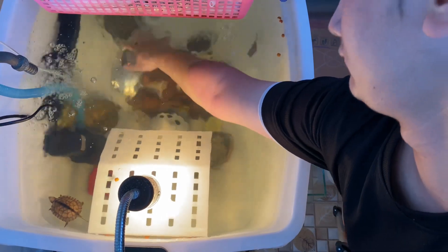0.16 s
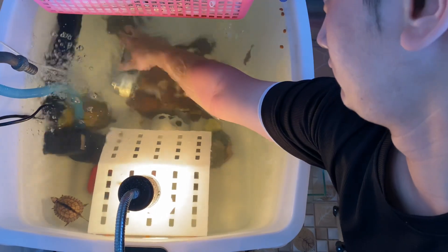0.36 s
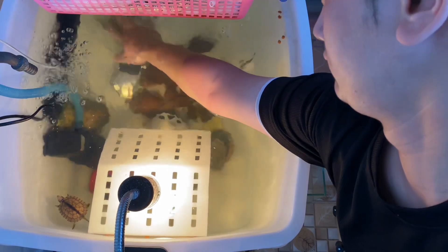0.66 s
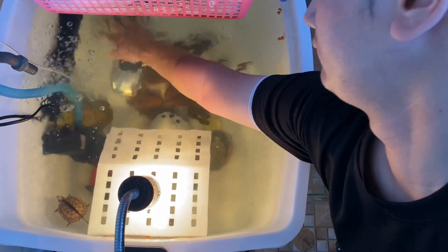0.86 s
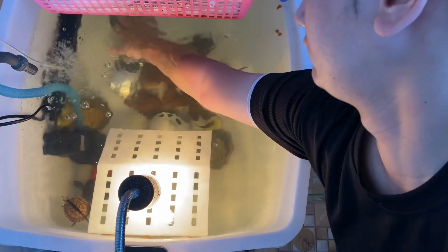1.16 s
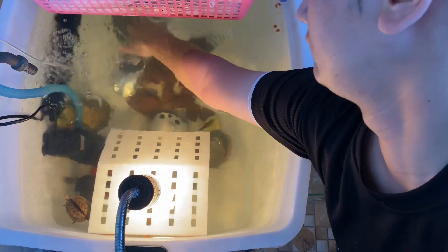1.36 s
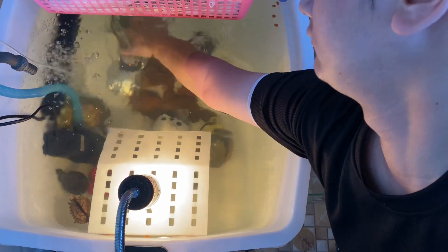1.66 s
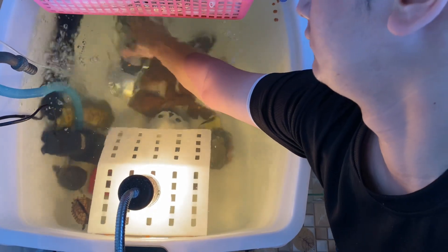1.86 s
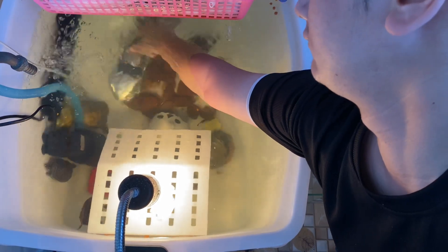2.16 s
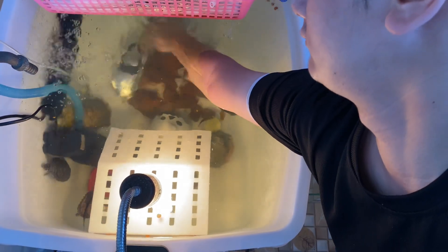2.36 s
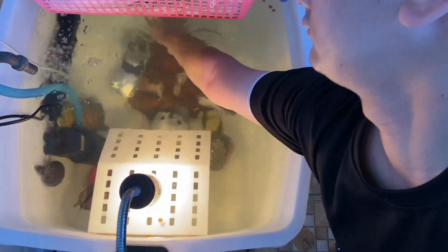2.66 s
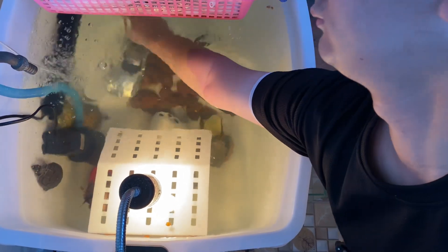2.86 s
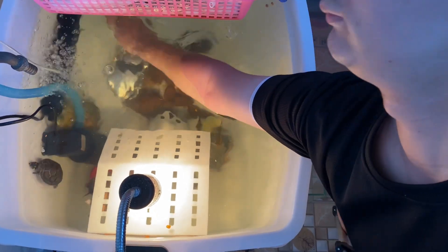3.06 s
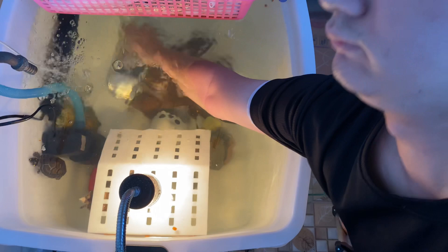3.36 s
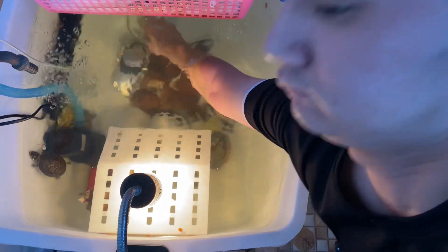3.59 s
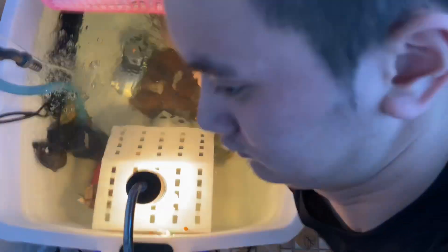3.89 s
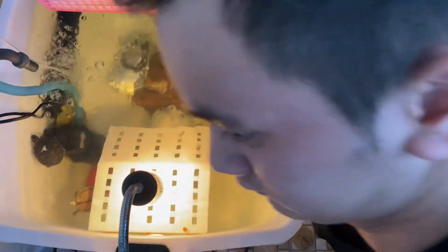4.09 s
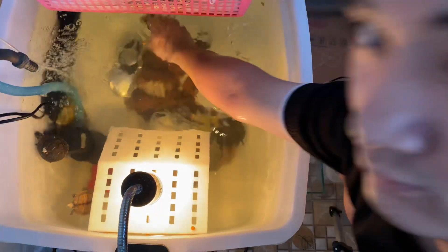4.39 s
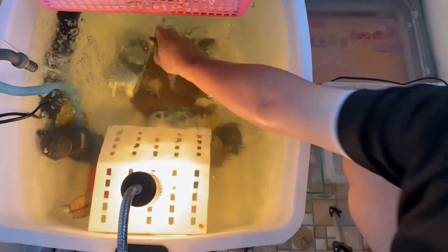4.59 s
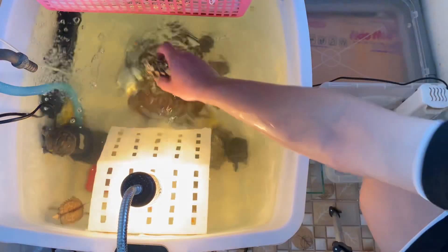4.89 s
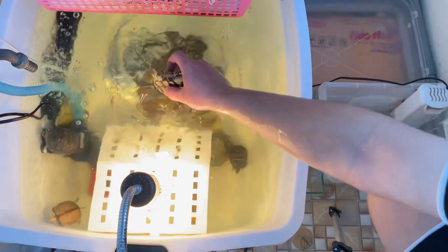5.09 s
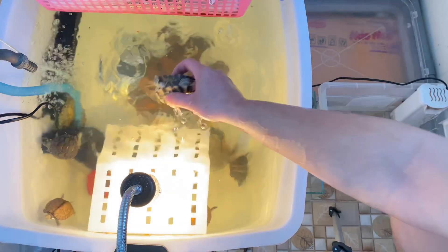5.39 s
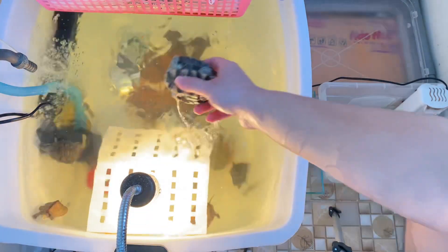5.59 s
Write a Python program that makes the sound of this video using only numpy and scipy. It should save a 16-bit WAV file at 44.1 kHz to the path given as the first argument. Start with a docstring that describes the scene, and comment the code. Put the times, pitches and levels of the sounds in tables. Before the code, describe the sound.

A small submerged pump gives a steady low hum while its outlet pours into a water-filled plastic tub, bubbling and splashing. Bright drips and ticks of spray are scattered throughout as a hand stirs the water. About two thirds through, something knocks hollowly against the tub wall in a quick clatter, ending in a dull bump. The water and hum carry on, heard close from above in a small tiled room.

```python
"""A small submerged pump hums in a plastic turtle tub indoors, its magnet vibrating at twice the shaft speed.
Its outlet pours onto the water: turbulence excites the tub's resonances, trapped air rings as
bubbles, and spray and single bright drips tick on the surface. A hand gropes in the tub, knocks
something hollow against its wall and lifts a dripping turtle out. A close two-port microphone
listens from above in a small tiled room; near the end the low sound briefly swings wide."""
import sys
import numpy as np
from scipy import signal
from scipy.fft import rfft, irfft
from scipy.io import wavfile

SR = 44100
rng = np.random.default_rng(int(sys.argv[2]) if len(sys.argv) > 2 else 0)


def dump(signal):
    """Clip the signal to [-1, 1] and save it as 16-bit WAV at the path in sys.argv[1]."""
    limited = np.clip(np.atleast_2d(signal).T, -1, 1)
    pcm = np.round(limited * 32767).astype(np.int16)
    wavfile.write(sys.argv[1], SR, pcm)


N = 253134
TIME, FREQS = np.arange(N) / SR, np.fft.rfftfreq(2 ** 18, 1 / SR)
CUTOFF_HZ = 15850

# Colour of the room's echoes. Each row: frequency in Hz, relative level in dB.
ROOM_COLOUR = [(100, -1), (500, 1), (1500, 3), (3500, 2), (6000, 4), (10000, -1), (16000, -14)]
# Left-right likeness of diffuse sound. Each row: frequency in Hz, coherence from 0 to 1.
COHERENCE = [(100, 1), (300, 0.98), (640, 0.61), (1200, 0), (1800, 0.61), (2800, 0.46), (3800, 0.17),
             (4600, 0.13), (5400, 0.65), (7000, 1), (15000, 1)]
# Lead of the left port for the water. Each row: frequency in Hz, phase in radians.
PORT_PHASE = [(100, 0), (1700, 0), (2700, 1.6), (3700, .5), (4400, 1), (5100, .15), (6000, 1.6),
              (6500, 2.6), (7000, 3.05), (7900, 3.3), (8500, 4.3), (9800, 6.1), (11300, 6.45), (12700, 9.1),
              (14300, 9.6), (15700, 12.2)]
# Balance of the water. Each row: frequency in Hz, left minus right in dB.
WATER_PAN = [(300, 0), (600, -1.5), (1100, -0.8), (2500, -0.7), (4600, -1), (5300, 0), (8000, 0)]
# Brief widening. Each row: time in seconds, left-right phase in radians of hum, bass and low middle.
SWING = [(5.375, 0, 0, 0), (5.41, .8, 3.05, 2.6), (5.43, .8, 3.1, 3.1), (5.52, -.4, 3.05, 3.05),
         (5.535, -.4, 2.9, .6), (5.58, -.9, 2.8, .3), (5.64, -.4, 1.8, 0), (5.68, 0, 0, 0)]
# Upper edges of those three bands in Hz.
SWING_EDGES_HZ = [135, 350, 720]

# Resonances of the water-filled tub. Each row: frequency in Hz, width in Hz, level in dB.
TUB_MODES = [(58.2, 11, -47.5), (75.5, 29.5, -43), (176.6, 19, -46), (199, 5.3, -54), (244, 28, -57),
             (312.5, 29, -53.5), (362.4, 13.6, -48.5), (545, 36, -52.5), (614.8, 6, -52.5),
             (1120, 29, -55.5)]
# Spectra of wash, bubbles and spray. Each row: frequency in Hz, relative spectral density in dB.
WASH_SPECTRUM = [(20, -116), (33, -79), (46, -60), (85, -77), (125, -77), (280, -77), (450, -73.5),
                 (800, -79), (1200, -83), (1900, -88), (2700, -90), (4300, -92.5), (5300, -99),
                 (10000, -101), (16000, -103)]
BUBBLE_SPECTRUM = [(250, -78), (500, -76), (1000, -78), (1500, -84), (2000, -87.5), (2800, -87.5),
                   (4400, -96.5), (5200, -94), (8000, -100), (16000, -112)]
SPRAY_SPECTRUM = [(1000, -105), (4000, -101), (7000, -103.5), (11000, -95.5), (16000, -103)]
# Vigour of the water as the hand stirs. Each row: time in seconds, splash and spray in relative dB.
SPLASH_LEVELS = [(0, -47, -53.5), (.2, -51.5, -63), (.6, -51.5, -56.5), (1.2, -51, -61), (1.55, -50, -56),
                 (1.85, -49.5, -60.5), (2.15, -50.5, -55.5), (2.45, -48.5, -62.5), (3.05, -49.5, -58),
                 (3.3, -49.5, -59.5), (3.62, -47, -67), (3.9, -46.5, -58.5), (4.4, -49.5, -61.5),
                 (4.8, -47, -54), (5.15, -49, -54.5), (5.35, -49, -54), (5.74, -50, -58.5)]
# Drips that trap air. Each row: start in seconds, relative level in dB, pitch in Hz, splat gain in dB.
DRIPS = [(.098, -35.5, 3050, -8.5), (0.111, -41, 2470, 3), (.296, -35, 3060, -1.5),
         (.370, -39.5, 2750, 7.5), (.382, -48.5, 4300, 10), (0.5051, -25.5, 3404, -8), (.508, -38, 4750, 2),
         (.598, -43, 5350, 3), (1.028, -43, 3140, 7), (1.175, -31, 1260, -17), (1.271, -38.5, 3870, -6.5),
         (1.475, -34, 1580, -8), (1.496, -37, 3600, 0), (1.577, -44, 3300, -2), (1.662, -37, 2480, -1),
         (1.665, -35, 3130, -2), (1.822, -39, 1590, 4.5), (1.838, -48, 3290, 8), (1.911, -43, 4000, -2),
         (2.045, -42.5, 3200, 4), (2.384, -43, 2960, 6), (2.564, -41, 3080, -11), (2.642, -31, 4720, -15),
         (2.793, -34, 2890, -7), (2.928, -37, 5770, -3), (2.933, -42, 4920, -9), (2.996, -39.5, 3900, -8),
         (3.040, -38.5, 3910, -2), (3.15, -26.5, 2820, -7.5), (3.276, -36.5, 3600, -9),
         (3.336, -41, 3650, -16), (3.354, -37, 3480, -14), (3.421, -47.5, 5000, 9), (3.605, -31, 1566, -3),
         (3.612, -33, 1276, -21), (3.96, -35, 2270, -11), (3.997, -40, 3500, -5), (4.231, -38, 3390, -0.5),
         (4.298, -44, 5840, -4.5), (4.370, -45, 3570, -1), (4.383, -43, 5000, 1), (4.87, -37.5, 2970, 3.5),
         (4.951, -35, 3820, -9), (5.073, -31.5, 1060, 1), (5.151, -44, 3360, 8), (5.192, -39, 3120, 0),
         (5.258, -39, 3350, -5), (5.389, -41.5, 4080, -24), (5.499, -37, 1815, -5.5),
         (5.595, -35, 2450, -7), (5.612, -44, 3650, -2)]
# Drops that slap. Each row: start in seconds, relative level in dB, centre in Hz, width in octaves.
SLAPS = [(0.161, -36, 7960, 1), (0.2605, -26, 11000, 1), (.506, -32.5, 6860, 1.5), (.534, -34, 10000, .8),
         (0.942, -35, 12000, 1), (1.797, -41, 7500, 1.5), (2.4178, -31, 12000, 1.2),
         (2.642, -32.5, 8000, 1), (2.841, -35, 6600, .6), (3.485, -27, 10500, 1.3),
         (3.4856, -23, 2420, 1.8), (4.9335, -31, 4400, .8), (4.934, -23.5, 7400, .7),
         (5.105, -35, 6000, .6), (5.312, -34, 7800, .8), (5.343, -36, 10000, .8), (5.511, -28, 6400, .5),
         (5.514, -36, 10000, .8)]
# Droplet showers. Each row: start in seconds, relative level in dB, centre in Hz, length in seconds.
SPATTERS = [(0.09, -38.5, 10500, 0.037), (0.302, -38.5, 3180, .03), (0.798, -39, 1330, .06),
            (1.486, -39, 1500, .04), (1.496, -37.5, 5070, .05), (2.641, -35, 3540, .014),
            (2.786, -50, 3100, 0.034), (3.016, -39.5, 2430, 0.079), (5.079, -36.5, 11000, 0.025),
            (5.485, -35.5, 2600, .016), (5.59, -36, 2780, .02)]

# Hollow knocks on the tub. Each row: start in seconds, relative level in dB, low-pass edge in Hz,
# thud gain in dB, thud T60 (time to fall 60 dB) in seconds.
KNOCKS = [(3.697, -18, 1720, 5, 0.03), (3.709, -17.5, 1430, 8, 0.038), (3.720, -19, 1610, 7.5, 0.057),
          (3.735, -26, 1200, -0.5, 0.038), (3.748, -31, 1150, 12, 0.099), (3.766, -31.5, 1390, 15.5, 0.055),
          (3.795, -38, 1100, 13, 0.063)]
# Modes of the tub wall. Each row: frequency in Hz, relative level in dB, T60 in seconds.
WALL_MODES = [(89.2, -9.5, 1), (251.6, -18.5, 0.98), (469, -8.5, 0.2), (530, -6.5, 0.1), (608.5, 5.5, 0.13),
              (740, -9, 0.084), (817.6, 1.5, 0.13), (902, 0, 0.14), (984, -5.5, 0.11), (1230, -4, 0.074),
              (1440, -5.5, 0.087), (1570, 0.5, 0.048), (1780, -11, 0.06), (2390, -1, 0.12)]
# Contact noise of a knock. Each row: frequency in Hz, relative level in dB.
THUD_SPECTRUM = [(35, -21), (80, 21), (200, 2), (330, 7), (600, 5), (950, 2), (1600, 2.5), (2500, 12),
                 (6000, -10)]
# The held object's last bump. Each row: start in seconds, level in dB, pitch in Hz, T60 in seconds.
BUMPS = [(3.872, -21, 1000, .02), (3.874, -24, 170, .09), (3.8755, -21, 600, .014), (3.876, -19, 350, .02)]

# Impeller tones. Each row: multiple of the shaft speed, rms level in dB.
IMPELLER_TONES = [(1, -49), (4, -58), (5, -57.5), (6, -78), (8, -59), (12, -67), (13, -81), (14, -81),
                  (15, -63), (16, -63), (17, -65.5)]
# The magnet's hum. Each row: time in seconds, rms level in dB.
HUM_LEVEL = [(0, -28), (.6, -28.5), (.85, -26.5), (1.2, -29.5), (1.8, -29), (2.05, -28.5), (2.6, -29.5),
             (3.15, -30), (3.7, -29), (4.45, -27.5), (4.85, -30), (5.3, -27.5), (5.45, -26.5), (5.52, -32),
             (5.6, -29), (5.74, -29)]


def from_db(db):
    """Amplitude ratio of a level in decibels."""
    return 10 ** (np.asarray(db) / 20)


def rms_one(x):
    """Normalisation to unit rms."""
    return x / np.sqrt(np.mean(x ** 2) + 1e-20)


def in_time(rows):
    """Linear interpolation of each column at every sample."""
    times, *columns = np.transpose(rows)
    return [np.interp(TIME, times, column) for column in columns]


def at_hz(points):
    """Interpolation of a table over log frequency."""
    hz, value = np.transpose(points)
    return np.interp(np.log(FREQS + 1), np.log(hz), value)


def filtered(x, response):
    """Linear filtering: the spectrum is multiplied by a frequency response."""
    return irfft(rfft(x, 2 * (len(FREQS) - 1)) * response)[..., :N]


def coloured(x, spectrum):
    """Spectral shaping: a white signal takes on the given spectral density."""
    return filtered(rms_one(x), from_db(at_hz(spectrum)) * np.sqrt(SR / 2))


def split(x, hz):
    """Complementary crossover: the parts of x below and above a frequency."""
    low = filtered(x, 1 / (1 + (FREQS / hz) ** 6))
    return low, x - low


def drift(rate_hz):
    """Slow random fluctuation: low-passed noise of unit rms."""
    hop = 100
    pole = np.exp(-2 * np.pi * rate_hz * hop / SR)
    noise = rng.standard_normal(N // hop + 2002)
    slow = signal.lfilter([1], [1, -2 * pole, pole * pole], noise)[2000:]
    return np.interp(np.arange(N) / hop, np.arange(len(slow)), rms_one(slow))


def add(out, start_s, sound):
    """Superposition of a short sound on out."""
    start = int(np.clip(start_s * SR, 0, N - 1))
    out[start:start + len(sound)] += sound[:N - start]


def fade(t60, hold_s=0):
    """Exponential decay to -60 dB after a hold at full strength."""
    t = TIME[:int((hold_s + t60) * SR) + 2]
    return from_db(-60 * np.maximum(t - hold_s, 0) / t60)


def burst(t60, hold_s=0):
    """Exponentially damped noise."""
    decay = fade(t60, hold_s)[:SR]
    return rng.standard_normal(SR)[:len(decay)] * decay


def ring(hz, t60, rise=0):
    """Damped oscillator: a bubble's pitch rises as it nears the surface, a solid's does not."""
    decay = fade(t60)
    t = TIME[:len(decay)]
    attack = 1 - np.exp(-t * hz)
    return decay * attack * np.sin(2 * np.pi * hz * t * (1 + rise * t / t60))


def diffuse(pair):
    """Partial coherence: two independent signals become left and right, their likeness set by pitch."""
    alike = np.clip(at_hz(COHERENCE), 0, 1)
    mid, side = filtered(pair, np.sqrt([(1 + alike) / 2, (1 - alike) / 2]))
    return np.array([mid + side, mid - side])


def in_room(x, wet_db, t60=.32):
    """Reverberation: dense, exponentially decaying reflections follow the direct sound."""
    echoes = rng.standard_normal((2, N)) * from_db(-60 * TIME / t60) * (TIME > .003)
    response = diffuse(rms_one(echoes) / np.sqrt(N))
    reverb = signal.fftconvolve(x[None], response)[:, :N]
    return x + filtered(reverb, from_db(at_hz(ROOM_COLOUR) + wet_db))


def with_wall_echo(x, delay_s=0.036, echo_db=-24):
    """Specular reflection: a bare wall returns one delayed copy."""
    return x + from_db(echo_db) * np.interp(TIME - delay_s, TIME, x, left=0)


def at_ports(water):
    """Level and phase differences between the two ports place the water in stereo."""
    panned = filtered(water, from_db(at_hz(WATER_PAN) * np.array([[.5], [-.5]])))
    half_phase = at_hz(PORT_PHASE) / 2
    return filtered(panned, np.exp([1j * half_phase, -1j * half_phase]))


def churn():
    """Forced resonance: turbulence keeps the tub's modes sounding over a smooth wash."""
    power = from_db(at_hz(WASH_SPECTRUM)) ** 2
    for hz, width, db in TUB_MODES:
        peak_power = from_db(db) ** 2 * 2 / (np.pi * width)
        power += peak_power / (1 + ((FREQS - hz) / width) ** 2) ** 2
    return diffuse(filtered(rng.standard_normal((2, N)), np.sqrt(power * SR / 2)))


def bubbling(count=6000, size_db=4.5, range_db=10, cycles=34):
    """Air entrainment: the jet drags under bubbles of all sizes, each ringing at its own resonance."""
    out = np.zeros(N)
    for when, pitch, size, life in rng.random((count, 4)):
        hz = 350 * 28 ** pitch
        above_db = min(-size_db * np.log(size + 1e-9), range_db)
        strength = from_db(above_db) * hz   # small bubbles ring briefly but sharply
        add(out, when * N / SR, strength * ring(hz, cycles * (.5 + life) / hz, rise=0.0082))
    return coloured(out, BUBBLE_SPECTRUM)


def spray(per_s=1100, size_db=3.5, clump_db=4.0, crackle_s=0.041):
    """Shot noise: fine droplets and bursting foam tick in clumps, and their energies add."""
    born = rng.random(N) < per_s * from_db(clump_db * drift(15)) / SR
    sizes = from_db(size_db * np.minimum(rng.exponential(1, N), 4.5))
    energy = signal.fftconvolve(born * sizes ** 2, fade(crackle_s) ** 2)[:N]
    return coloured(np.sqrt(np.abs(energy)) * rng.standard_normal(N), SPRAY_SPECTRUM)


def swell(level_db, surge, depth, surge_db, flicker_db):
    """Amplitude modulation by a level curve about its median, the jet's surges and a random flicker."""
    trend_db = depth * (level_db - np.median(level_db))
    return from_db(trend_db + surge_db * surge + flicker_db * drift(15.6))


def pour():
    """Unsteady flow modulates the jet: big bubbles churn evenly, small ones and spray vary more."""
    splash_db, spray_db = in_time(SPLASH_LEVELS)
    surge = drift(12.5)
    water = churn() + in_room(bubbling(), wet_db=1.5) * from_db(-6)
    low, rest = split(water, hz=735)
    gurgle, splatter = split(rest, hz=2250)
    low *= swell(splash_db, surge, depth=0.34, surge_db=0.68, flicker_db=0.26)
    gurgle *= from_db(0.08) * swell(splash_db, surge, depth=0.87, surge_db=0.25, flicker_db=1.13)
    splatter *= from_db(-0.5) * swell(splash_db, surge, depth=1.0, surge_db=0.5, flicker_db=1.37)
    mist = sum(band * swell(spray_db, surge, depth=0.79, surge_db=-1.5, flicker_db=2.2)
               for band in split(spray(), hz=12400))
    return low + gurgle + splatter + in_room(mist * from_db(-1.5), wet_db=-4.5)


def plinks(count=45, loudest_db=-42, range_db=7, cycles=70):
    """Bubble resonance: stray droplets beside the jet each trap one small, clear bubble."""
    out = np.zeros(N)
    for when, pitch, size in rng.random((count, 3)):
        hz = 2300 * 2.5 ** pitch
        strength = from_db(loudest_db - range_db * size)
        add(out, when * N / SR, strength * ring(hz, cycles / hz, rise=0.0062))
    return out


def droplets(hz, length_s, count, spread_octaves=.36, cycles=18):
    """Superposed resonances: a ragged, weakening run of tiny bubbles about one pitch, with peak 1."""
    out = np.zeros(SR // 2)
    for k, (when, pitch, size) in enumerate(rng.random((count, 3))):
        late = (k + when) / count if k else 0
        pitch_hz = min(hz * 2 ** (spread_octaves * (2 * pitch - 1)), CUTOFF_HZ)
        strength = (1 - late / 2) * (.5 + size / 2)
        add(out, late * length_s, strength * ring(pitch_hz, cycles / pitch_hz))
    return out / np.abs(out).max()


def drips(t60_at_1khz=0.061, sharp_per_khz=.028, settle_s=.0055):
    """Bubble resonance: a large drop splats and traps air that rings, the higher the shorter."""
    out = np.zeros(N)
    for start, db, hz, splat_db in DRIPS:
        khz = hz / 1000
        decay = fade(t60_at_1khz / khz ** 0.53, hold_s=0.0024)
        t = TIME[:len(decay)]
        attack = 1 - np.exp(-t * hz / 2)
        pitch_hz = hz * (1 + sharp_per_khz * khz * np.exp(-t / settle_s))   # starts sharp and settles
        plink = decay * attack * np.sin(2 * np.pi * np.cumsum(pitch_hz) / SR)
        splat = droplets(hz, length_s=0.017, count=7, spread_octaves=0.32)
        add(out, start, from_db(db + splat_db) * splat)
        add(out, start, from_db(db) * plink)
    return out


def slaps():
    """Impact noise: drops that trap no air tick; the hand and the jet also throw up runs of droplets."""
    out = np.zeros(N)
    for start, db, hz, octaves in SLAPS:
        edges_hz = np.minimum(hz * 2 ** (octaves * np.array([-.5, .5])), .45 * SR)
        band = signal.butter(2, edges_hz, "band", fs=SR, output="sos")
        tick = signal.sosfilt(band, burst(t60=0.012, hold_s=0.0016))   # holds while the drop flattens
        add(out, start, from_db(db) * tick / np.abs(tick).max())
    for start, db, hz, length_s in SPATTERS:
        add(out, start, from_db(db) * droplets(hz, length_s, count=16))
    return out


def knocks(ring_db=-6, mode_spread_db=2, detune=0.017):
    """Modal vibration: each contact thuds and rings the tub wall, detuned a little by the water's load."""
    out = np.zeros(N)
    for start, db, edge_hz, thud_db, thud_t60 in KNOCKS:
        blow = from_db(thud_db) * filtered(burst(thud_t60), from_db(at_hz(THUD_SPECTRUM)))[:SR]
        for k, (mode_hz, mode_db, t60) in enumerate(WALL_MODES):
            strength, load = rng.uniform(-1.18, 1, 2)
            gain = (-1) ** k * from_db(ring_db + mode_db + mode_spread_db * strength)
            add(blow, 0, gain * ring(mode_hz * (1 + detune * load), t60)[:SR])
        softness = signal.butter(6, edge_hz, fs=SR, output="sos")   # soft contacts are duller
        add(out, start, from_db(db) * signal.sosfilt(softness, blow))
    return out


def bumps():
    """Heavy damping: the hand chokes the held object's ring to a dead thud."""
    out = np.zeros(N)
    for start, db, hz, t60 in BUMPS:
        add(out, start, from_db(db) * ring(hz, t60))
    return out


def pump(shaft_hz=49.85, wander_hz=0.12, hum_flutter_db=0.79, tone_flutter_db=4.5):
    """Periodic forcing: the magnet hums at twice the shaft speed; the impeller adds weak harmonics."""
    angle = 2 * np.pi * np.cumsum(shaft_hz + wander_hz * drift(3.0)) / SR
    hum_db = in_time(HUM_LEVEL)[0] + hum_flutter_db * drift(14.0)
    out = from_db(hum_db) * np.sin(2 * angle)
    for multiple, db in IMPELLER_TONES:
        gain = from_db(db + tone_flutter_db * drift(3.9))
        out += gain * np.sin(multiple * angle + 2 * np.pi * rng.random())
    return np.sqrt(2) * out


def scene():
    """Superposition of pump, water and knocks at the two ports."""
    ticks = in_room(with_wall_echo(slaps()), wet_db=-5) * from_db(1.5)
    drops = in_room(with_wall_echo(drips() + plinks()), wet_db=-4) * from_db(-4)
    water = at_ports(pour() + ticks + drops)
    hum = pump()
    knocking = in_room(knocks(), wet_db=-5.5) * from_db(-1)
    return hum + water + knocking + in_room(bumps(), wet_db=-8)


def record(dry):
    """A left-right phase difference briefly widens the low bands; a steep low-pass cuts the top."""
    lows, rest = 0, dry
    for edge_hz, phase in zip(SWING_EDGES_HZ, in_time(SWING)):
        band = filtered(rest, 1 / (1 + (FREQS / edge_hz) ** 16))
        rest = rest - band
        quadrature = filtered(band, np.array([[1j], [-1j]]))
        lows = lows + np.cos(phase / 2) * band + np.sin(phase / 2) * quadrature
    return filtered(lows + rest, 1 / np.sqrt(1 + (FREQS / CUTOFF_HZ) ** 200))


dry = scene()
out = record(dry)
dump(out)
```